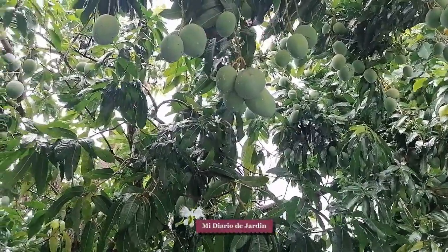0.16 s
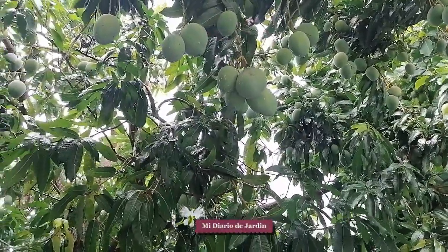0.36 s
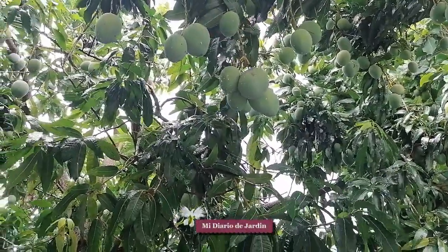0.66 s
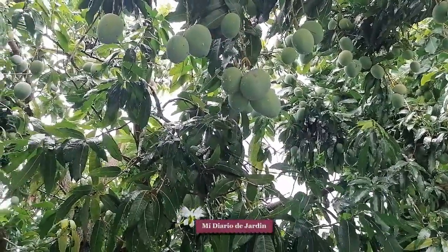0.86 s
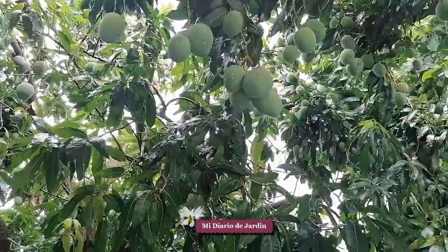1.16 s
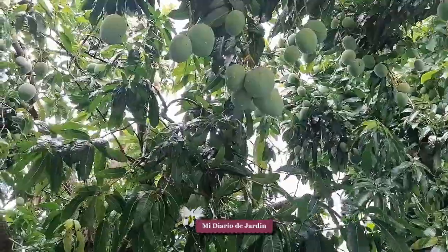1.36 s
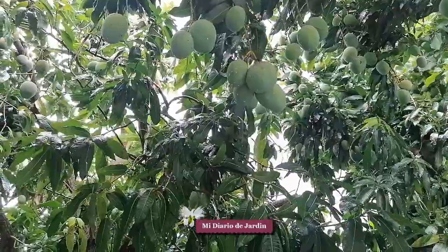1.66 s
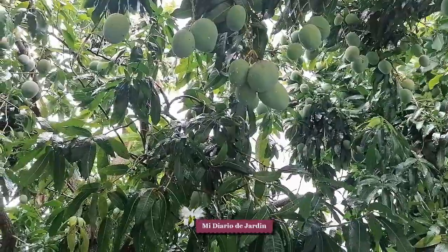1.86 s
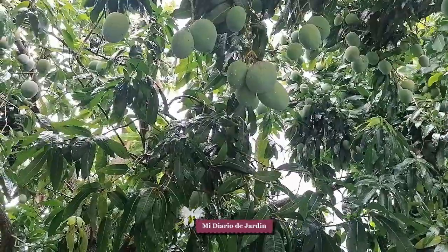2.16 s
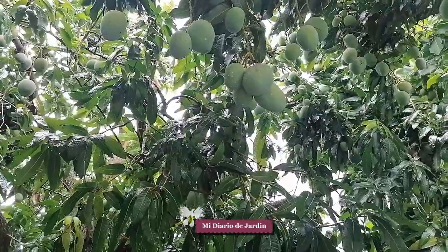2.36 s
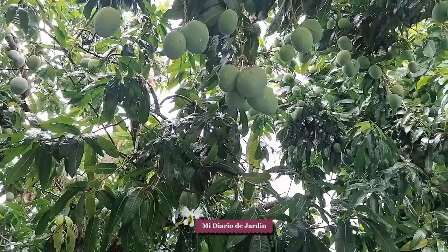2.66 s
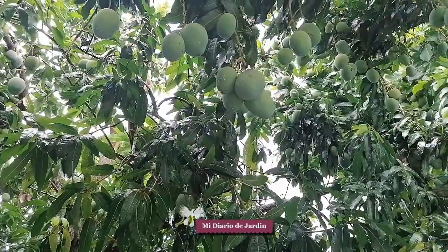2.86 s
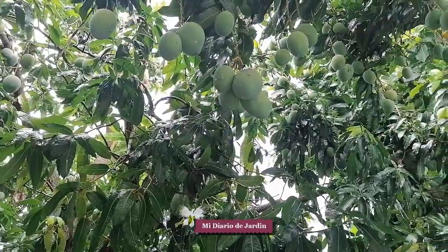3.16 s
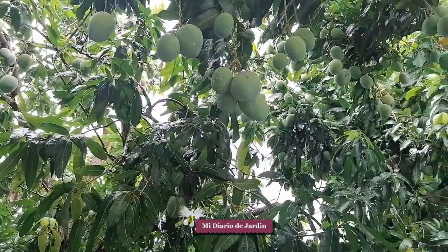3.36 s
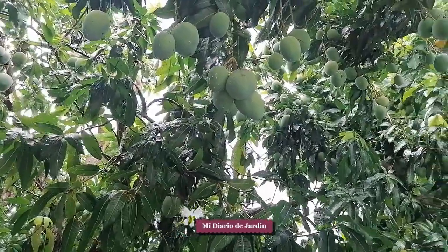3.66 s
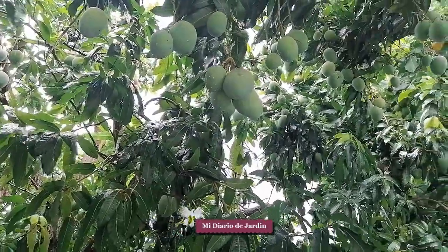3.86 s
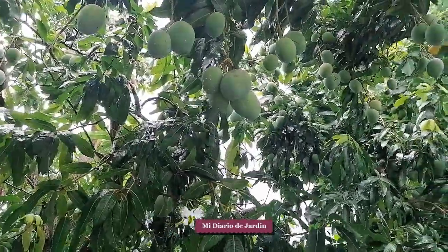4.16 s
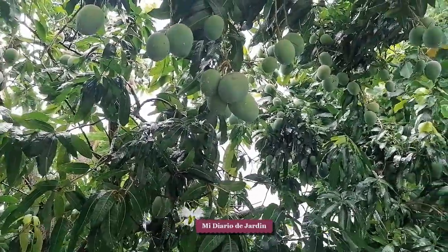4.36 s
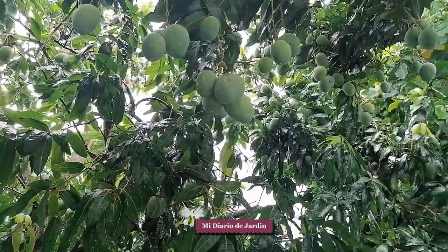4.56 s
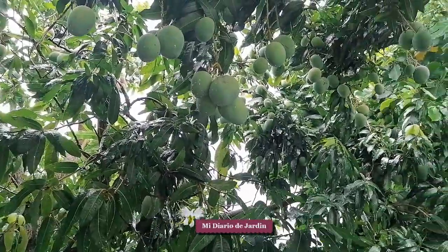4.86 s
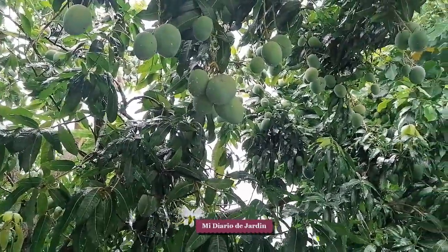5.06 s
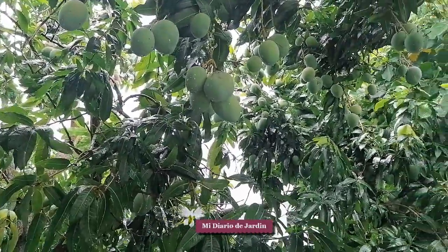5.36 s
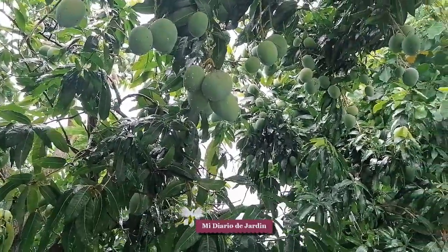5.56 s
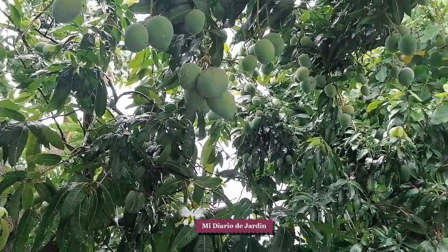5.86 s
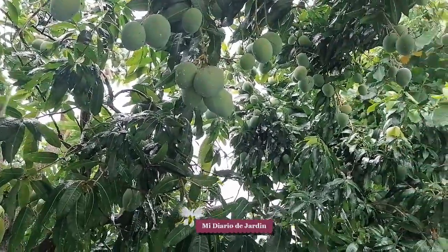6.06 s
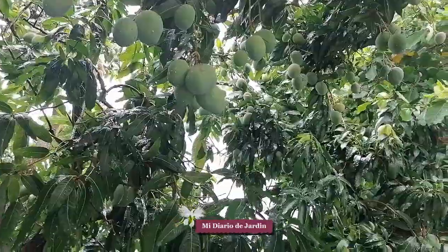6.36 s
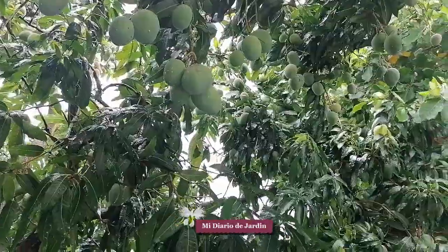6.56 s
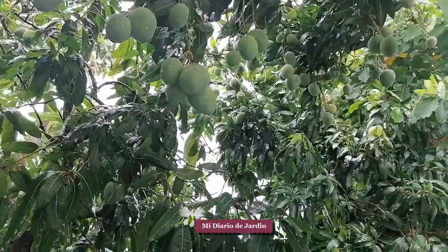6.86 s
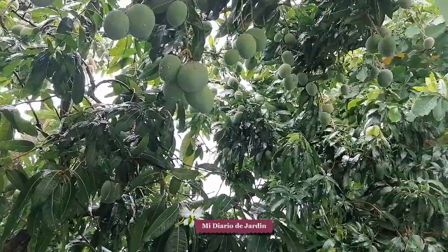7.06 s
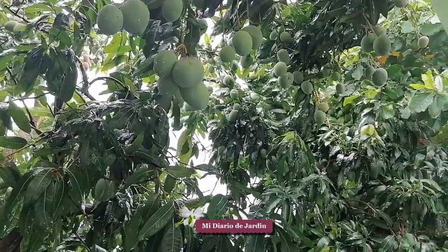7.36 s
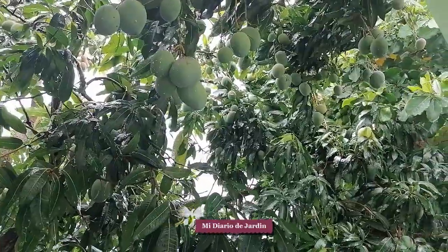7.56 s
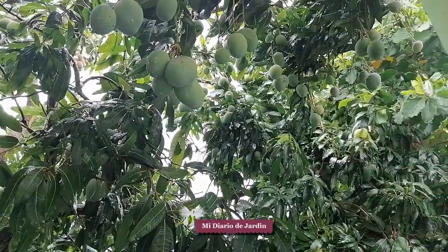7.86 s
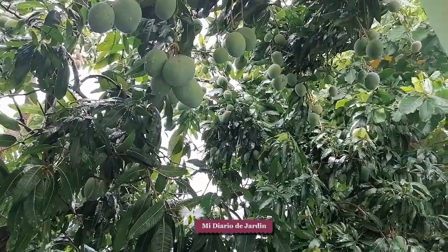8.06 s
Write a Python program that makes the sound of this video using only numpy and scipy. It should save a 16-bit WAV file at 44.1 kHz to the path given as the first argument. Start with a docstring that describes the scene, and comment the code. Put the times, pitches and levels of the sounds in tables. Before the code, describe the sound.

Steady rain patters densely on mango tree leaves, big drops smacking nearby foliage, with faint low rumbles and one brief cut to silence.

```python
"""Big drops of steady rain smack the nearest leaves of a fruit tree, heard from close below, in mono.
Each is a coloured noise burst, a weaker rebound and a decaying spray. Behind them come a patter of
random leaf taps, narrow-band ticks, faintly pitched plips, dull plops on soil and a wash of shaped noise.
A low resonant rumble swells now and then in the distance; all sound cuts out once for a moment."""
import sys
import numpy as np
from scipy import signal
from scipy.fft import rfft, irfft
from scipy.io import wavfile
from scipy.ndimage import uniform_filter1d

SR = 44100
rng = np.random.default_rng(int(sys.argv[2]) if len(sys.argv) > 2 else 0)


def materialize(psi):
    """Save the field psi as 16-bit PCM at rate SR to the path in sys.argv[1].

    A 1-D psi becomes a single channel; in a 2-D psi each row is a channel.
    """
    bounded = np.clip(np.atleast_2d(psi).T, -1, 1)
    quanta = np.round(bounded * 32767).astype(np.int16)
    wavfile.write(sys.argv[1], SR, quanta)


N = 361619
TIME = np.arange(N) / SR


def gain_of(db):
    """Decibels to amplitude."""
    return 10 ** (np.asarray(db) / 20)


def evened(x):
    """Scales to rms 1."""
    return x / np.sqrt(np.mean(x ** 2) + 1e-20)


def read(points, hz):
    """Reads a (Hz, dB) curve on a log-frequency axis."""
    f, value = np.transpose(points)
    return np.interp(np.log(hz + 1), np.log(f + 1), value)


def follow(curve):
    """Reads a (seconds, value) curve at every sample."""
    return np.interp(TIME, *np.transpose(curve))


def add(mix, start_s, sound):
    """Mixes a sound in at start_s."""
    part = mix[max(round(start_s * SR), 0):][:len(sound)]
    part += sound[:len(part)]


def tint(x, db):
    """Filters x by one dB value per frequency bin."""
    return irfft(rfft(x) * gain_of(db), len(x))


def band_db(hz, centre_hz, width_hz):
    """Response of one narrow resonance, 0 dB at its centre."""
    return -20 * np.log10(1 + ((hz - centre_hz) / width_hz) ** 2)


# Far-rain spectrum. Each row: frequency in Hz, relative level in dB.
WASH_SPECTRUM = [(15, -0.5), (35, 5), (90, -0.5), (170, -16), (300, -13.5), (700, 3.5), (1300, -3),
                 (2050, 4.5), (2900, 1), (4700, 1.5), (6300, 4.5), (8000, 1), (9500, -5)]


def wash(patchy_db=0.4):
    """Far rain: drops too many to tell apart, as shaped noise with faint patches in time and pitch."""
    frames, hz = N // 256 + 5, np.fft.rfftfreq(1024, 1 / SR)
    real, imag, patches = rng.standard_normal((3, frames, len(hz)))
    patches = uniform_filter1d(patches, size=8, axis=0)
    patches = evened(uniform_filter1d(patches, size=14, axis=1))
    z = (real + 1j * imag) * gain_of(read(WASH_SPECTRUM, hz) + patchy_db * patches)
    return evened(signal.istft(z.T, nperseg=1024, noverlap=768)[1][:N])


def swell(start_s, hold_s, db, attack_s=0.017, release_db_per_s=78):
    """A swell rises quickly, holds and dies away."""
    attack = np.clip((TIME - start_s) / attack_s + .5, 0, 1)
    return attack * gain_of(db - release_db_per_s * np.maximum(TIME - start_s - hold_s, 0))


# Rumble swells. Each row: start in seconds, hold in seconds, level in dB before the rumble's trim,
# deep bass in dB relative to that level.
RUMBLE_SWELLS = [(0, .15, -42, -22), (0.317, 0.12, -35, -22), (0.513, 0.21, -37, -12),
                 (0.829, .1, -38, -16), (1.44, 0.23, -47, -14), (1.81, 0.13, -42.5, -15),
                 (4.9, 0.12, -42.5, -3.5), (5.54, 0.082, -48, -25), (6.533, 0.072, -45, -12),
                 (6.728, 0.07, -41, -18), (7.718, 0.068, -44, -14)]


def swells(bed_db=-46):
    """Amplitude of the rumble, swells added in power to a steady bed, and of its deep bass."""
    power, bass_power = gain_of(bed_db) ** 2, 0
    for start_s, hold_s, db, bass_db in RUMBLE_SWELLS:
        swell_power = swell(start_s, hold_s, db) ** 2
        power = power + swell_power
        bass_power = bass_power + swell_power * gain_of(bass_db) ** 2
    return np.sqrt(power), np.sqrt(bass_power)


# Hollow resonances of the rumble. Each row: centre in Hz, width in Hz, relative level in dB.
HOLLOW_RESONANCES = [(136, 30, -7), (179, 50, -3), (267, 44, -2), (308.7, 25, 1), (402, 62, -7.5),
                     (465, 58, -5.5), (530, 200, -10.5), (700, 180, -14.5), (896, 50, -15.5)]
# Single-pitch booms. Each row: start in seconds, length in seconds, pitch in Hz, peak level in dB.
PITCHED_BOOMS = [(0.408, 0.083, 309, -49), (0.478, 0.093, 250.4, -33.5), (.522, 0.038, 167, -31.5),
                 (.57, 0.11, 311, -33.5), (0.664, 0.063, 310, -34), (0.838, 0.13, 312, -36)]
# Deep-bass band: lower edge in Hz, upper edge in Hz.
BASS_BAND_HZ = (68.2, 190)


def rumble(trim_db=-1, low_hz=100):
    """Distant noise in hollow resonances, deep bass under its swells, and brief single-pitch booms."""
    hz = np.fft.rfftfreq(N, 1 / SR)
    power = sum(gain_of(db) ** 2 / (1 + (2 * (hz - f) / width) ** 2) for f, width, db in HOLLOW_RESONANCES)
    power *= 1 - np.exp(-(hz / low_hz) ** 6)
    noise = tint(rng.standard_normal(N), 10 * np.log10(power + 1e-12))
    noise /= np.sqrt(uniform_filter1d(noise ** 2, size=3000))  # rolls on evenly within each swell
    level, bass_level = swells()
    bass_filter = signal.butter(2, BASS_BAND_HZ, "bandpass", fs=SR, output="sos")
    bass = evened(signal.sosfilt(bass_filter, rng.standard_normal(N)))
    out = (noise * level + bass * bass_level) * gain_of(trim_db)
    for start_s, length_s, pitch_hz, db in PITCHED_BOOMS:
        t = np.arange(round(length_s * SR)) / SR
        tone = np.sin(2 * np.pi * (pitch_hz * t + rng.random()))
        add(out, start_s, gain_of(db) * signal.windows.tukey(len(t), .6) * tone)
    return out


def plops(per_s=70, low_hz=850, high_hz=2800, cycles=1.9, count=16):
    """Drips from the tree land on the soil: short, dull pats of a few sine cycles."""
    out, t = np.zeros(N), np.arange(2 ** 11) / SR
    for hz in np.geomspace(low_hz, high_hz, count):
        u = 2 * t * hz / cycles
        pat = evened(u * np.exp(-u) * np.sin(2 * np.pi * hz * t))
        sizes = gain_of(2 * np.minimum(rng.exponential(1, N), 3))
        landings = rng.random(N) < per_s / count / SR
        out += signal.oaconvolve(sizes * landings, pat)[:N]
    return evened(out)


def leaf_colour(points, hz, slap_db, slap_hz, ripple_db, slap_width_hz, count=70):
    """Each leaf has its own random resonances, and more or less of a hollow slap."""
    knots = np.linspace(0, SR / 2, num=count)
    ripple = np.interp(hz, knots, rng.standard_normal(len(knots)))
    slap = np.exp(-((hz - slap_hz) / slap_width_hz) ** 2)
    return read(points, hz) + slap_db * slap + ripple_db * ripple


def smack(t, length_s):
    """A drop flattening on a leaf: a very short burst of noise."""
    u = t / length_s
    return u * np.exp(-u) * rng.choice([-1., 1.], len(t))


def spray(t, t60_s, grain_db, rise_s=0.00088):
    """Droplets and echoes scattering through the foliage: grainy, decaying noise."""
    wander = evened(uniform_filter1d(rng.standard_normal(len(t)), size=40))
    grainy = evened(gain_of(grain_db * wander) * rng.standard_normal(len(t)))
    return grainy * (1 - np.exp(-t / rise_s)) * gain_of(-60 * t / t60_s)


# Patter spectrum. Each row: frequency in Hz, relative level in dB.
PATTER_SPECTRUM = [(100, -27), (350, -8), (1100, -9), (2000, -3.5), (2900, -6.5), (4000, -5.5),
                   (4900, -2.5), (6300, -8), (7700, 2.5), (9500, -0.5)]


def patter(per_s=240, spread_db=2.5, wet_db=2, t60_s=0.29, length_s=0.00048, count=56):
    """Many leaves deeper in the tree, each with its own colour, struck at random by drops of all sizes."""
    out, t = np.zeros(N), np.arange(2 ** 13) / SR
    hz = np.fft.rfftfreq(len(t), 1 / SR)
    taps = []
    for _ in range(count):
        tap = evened(smack(t, length_s * rng.uniform(0.18, 1.95)))
        tap += gain_of(wet_db) * evened(spray(t, t60_s, grain_db=1.0))
        slap_db, slap_hz = 4.5 * rng.standard_normal() - 2, rng.uniform(3500, 5800)
        colour = leaf_colour(PATTER_SPECTRUM, hz, slap_db, slap_hz, ripple_db=3.5, slap_width_hz=800)
        taps.append(evened(tint(tap, colour)))
    for when, leaf, size in rng.random((2 ** 13, 3))[:round(per_s * N / SR)]:
        size_db = spread_db * min(-np.log(1 - size), 3)  # most drops are small
        add(out, when * N / SR, gain_of(size_db) * taps[int(leaf * count)])
    return evened(out)


def flicker(x):
    """The treble, most of all 4 to 7 kHz, flickers in patches a few hundred Hz wide, some 30 ms long."""
    hz, _, z = signal.stft(x, SR, nperseg=512, noverlap=384)
    patches = rng.standard_normal(z.shape)
    for _ in range(2):
        patches = uniform_filter1d(patches, size=2, axis=0)
        patches = uniform_filter1d(patches, size=9, axis=1)
    depth_points = [(1000, .3), (2500, 1.2), (4200, 3), (6500, 3.2), (8000, 1.6), (14000, 1.6)]  # Hz, dB
    gains = gain_of(read(depth_points, hz)[:, None] * np.minimum(evened(patches), 1.5))
    gains /= np.sqrt(np.mean(gains ** 2, axis=1, keepdims=True))
    return signal.istft(z * gains, nperseg=512, noverlap=384)[1][:N]


def leaf_ticks(per_s=75, low_hz=3200, high_hz=6800, width_hz=330, t60_s=0.16):
    """Small drops on stiff blades: each rings for a moment in one narrow band."""
    out, t = np.zeros(N), np.arange(2 ** 11) / SR
    hz = np.fft.rfftfreq(len(t), 1 / SR)
    bursts = rng.standard_normal((2 ** 7, len(t))) * gain_of(-60 * t / t60_s)
    for k, (when, a, b, size) in enumerate(rng.random((2 ** 11, 4))[:round(per_s * N / SR)]):
        pitch_hz = low_hz * (high_hz / low_hz) ** ((a + b) / 2)  # middling blades are the commonest
        tick = tint(bursts[k % len(bursts)], band_db(hz, pitch_hz, width_hz))
        add(out, when * N / SR, gain_of(13.0 * size) * evened(tick))
    return evened(out)


# Faintly pitched drips. Each row: start in seconds, pitch in Hz, nominal peak level in dB.
PITCHED_DRIPS = [(.561, 3040, -34), (1.266, 1435, -38), (1.409, 1950, -37), (1.722, 1435, -38),
                 (1.887, 2810, -37), (2.323, 3390, -33), (3.054, 1550, -34), (4.317, 1660, -38),
                 (4.514, 918, -36), (5.219, 1605, -36), (7.164, 1035, -38), (7.279, 3390, -27),
                 (7.399, 2870, -37)]


def plips(t60_s=0.17, rise_s=0.0005, width_hz=130):
    """Single drips ring briefly around one pitch, blurred by the foliage into narrow-band noise."""
    out, t = np.zeros(N), np.arange(2 ** 12) / SR
    bins_hz = np.fft.rfftfreq(len(t), 1 / SR)
    for start_s, pitch_hz, db in PITCHED_DRIPS:
        ring = evened(tint(rng.standard_normal(len(t)), band_db(bins_hz, pitch_hz, width_hz)))
        envelope = gain_of(db - 60 * t / t60_s) * (1 - np.exp(-t / rise_s))
        add(out, start_s, envelope * ring / np.sqrt(2))
    return out


def lesser_drops(per_s=2.3, hit_db=-22, tail_db=-35, slap_max_db=8, low_hz=3500, high_hz=6000):
    """Lighter drops reach the near leaves at random; rows like those of the big ones."""
    draws = rng.random((2 ** 8, 3))[:round(per_s * N / SR)]
    return [(when * N / SR, hit_db, tail_db, slap_max_db * hollow, low_hz + (high_hz - low_hz) * leaf)
            for when, hollow, leaf in draws]


# Big drops on the nearest leaves. Each row: start in seconds, smack level in dB, spray level in dB,
# extra weight of the leaf's slap in dB, slap frequency in Hz.
BIG_DROPS = [(0.0585, -17.5, -31, 9, 4320), (0.0787, -19, -30.5, 16, 4760), (0.392, -15, -28, 6, 4750),
             (0.59, -19.5, -29, 5, 3600), (0.9491, -16, -19.5, 4.5, 5260), (1.0471, -28, -24.5, 3, 5600),
             (1.2634, -21, -26.5, 11.5, 3560), (1.276, -14.5, -38, -6, 3720), (1.3588, -16, -27, 13, 3300),
             (1.492, -9.5, -21.5, 2.5, 4330), (1.5905, -20, -31, 10, 4080), (1.776, -15.5, -29, 11, 5330),
             (1.818, -15.5, -28, -3, 5900), (1.885, -16, -32, -5, 4200), (1.891, -21, -22, 5, 2900),
             (1.9633, -15.5, -25, -1, 4900), (2.1577, -17, -23, 8, 4000), (2.172, -17, -21, 3, 4600),
             (2.2807, -17, -26, -1, 4500), (2.311, -12, -22, 9.5, 3770), (2.495, -17, -24, -8, 3100),
             (2.603, -15.5, -27, 8, 5030), (3.033, -23, -24.5, 10, 3700), (3.058, -11.5, -21, 4, 3550),
             (3.1362, -14, -27, 11, 4030), (3.259, -13.5, -19, 0, 5780), (3.8792, -13, -26, 0, 3100),
             (4.2994, -30, -25, 3, 3600), (4.3365, -17, -24, 0, 3400), (4.4898, -19, -26, -11, 5900),
             (4.6214, -17, -30, 6.5, 4560), (4.843, -18.5, -29, 8, 4100), (4.8866, -15.5, -25.5, 4, 5150),
             (5.0069, -15.5, -26, -2, 6100), (5.2479, -14.5, -26, 7, 5100), (5.3284, -7, -20.5, 10.5, 4700),
             (5.4108, -20.5, -26, 6.5, 5100), (5.779, -20, -32, -1, 4700), (5.9146, -31, -24.5, 11, 4900),
             (5.965, -15.5, -30, 5, 5150), (6.1801, -17, -29, 0, 5000), (6.2656, -9, -25.5, 8.5, 4930),
             (6.287, -17, -22, 6, 5300), (6.5085, -18, -18.5, 3, 5800), (6.8324, -22.5, -35, 6, 6100),
             (7.1414, -14, -21.5, 1, 5600), (7.238, -16.5, -35, 4, 4800), (7.2842, -14.5, -20.5, 11, 3600),
             (7.3159, -9.5, -18.5, 5, 5700), (7.3287, -11.5, -24, 4, 5500), (7.7713, -9, -24.5, 9, 4760),
             (8.0393, -17.5, -23.5, 10, 4540)]
# Spectrum of a drop on a wet leaf. Each row: frequency in Hz, relative level in dB.
LEAF_SPECTRUM = [(100, -21), (350, -12), (1000, -14), (1800, -12), (2800, -13.5), (4300, -5), (6200, -6.5),
                 (7600, 1), (9500, -.3)]
REBOUND_S, REBOUND_DB = .0032, -4  # the splash lands again just after the smack
REBOUND_LOSS_PER_DB = 1.2  # leaves that give and slap swallow the rebound
SOFTNESS_PER_DB = .035  # the more a leaf slaps, the longer the smack; stiff leaves tick
# A drop shoves the whole leaf: low body, more the harder it lands.
PUSH_DB, PUSH_HZ, PUSH_PER_DB, TYPICAL_SMACK_DB = 2.5, 2017, 0.42, -15


def near_drops(length_s=0.00066, t60_s=0.26):
    """Drops on the nearest leaves: a sharp smack, a softer rebound, then spray."""
    out, t = np.zeros(N), np.arange(2 ** 13) / SR
    hz = np.fft.rfftfreq(len(t), 1 / SR)
    smack_samples = 66  # smack levels are rms over this span
    for start_s, hit_db, tail_db, slap_db, slap_hz in BIG_DROPS + lesser_drops():
        colour = leaf_colour(LEAF_SPECTRUM, hz, slap_db, slap_hz, ripple_db=1.54, slap_width_hz=1650)
        colour -= 10 * np.log10(np.mean(gain_of(colour) ** 2))
        push = (PUSH_DB + PUSH_PER_DB * (hit_db - TYPICAL_SMACK_DB)) / (1 + (hz / PUSH_HZ) ** 4)
        hit_length_s = length_s * np.exp(SOFTNESS_PER_DB * slap_db)
        rebound_db = hit_db + REBOUND_DB - REBOUND_LOSS_PER_DB * max(slap_db, 0)
        for delay_s, db in (0, hit_db), (REBOUND_S, rebound_db):
            hit = tint(smack(t, hit_length_s), colour + push)
            hit *= np.sqrt(smack_samples) / np.linalg.norm(hit)
            add(out, start_s + delay_s, gain_of(db) * hit)
        add(out, start_s, gain_of(tail_db) * tint(spray(t, t60_s, grain_db=-1.0), colour))
    return out


def flurries(low_hz=3, high_hz=9, count=24):
    """The drops come in small flurries: a random wander of rms 1 from summed sines."""
    rates_hz = np.geomspace(low_hz, high_hz, count)
    t = np.arange(0, N / SR + .01, .01)
    wander = np.sin(2 * np.pi * (rates_hz * t[:, None] + rng.random(count))) @ rates_hz ** -.5
    return evened(np.interp(TIME, t, wander))


# How hard the shower falls. Each row: time in seconds, level in dB before each layer's trim.
SHOWER_LEVEL = [(0, -32), (.5, -34.5), (1.2, -32), (1.75, -34), (2.2, -32), (2.85, -33), (3.05, -29.5),
                (3.3, -35), (3.68, -35), (4.15, -32), (4.5, -33.5), (5.15, -34), (5.42, -33), (6.05, -32.5),
                (6.55, -32), (7.42, -31.5), (7.6, -34), (8.2, -33)]


def scene(patter_db=3.0, ticks_db=-11.5, wash_db=-39, wash_share=0.19, plops_db=-53, flurry_db=0.34):
    """The shower drives the patter and the ticks fully, and the far wash a little."""
    shower_db = follow(SHOWER_LEVEL) + flurry_db * flurries()
    rain = patter() * gain_of(shower_db + patter_db)
    ticks = leaf_ticks() * gain_of(shower_db + ticks_db)
    far = wash() * gain_of(wash_db + wash_share * (shower_db - shower_db.mean()))
    soil = gain_of(plops_db) * plops()
    mono = near_drops() + flicker(rain + far) + ticks + soil + plips() + rumble()
    return np.array([mono, mono])


# Cut-out: start in seconds, end in seconds.
SILENT_SPAN_S = (3.3085, 3.648)
# Notched treble band: lower edge in Hz, upper edge in Hz.
NOTCH_BAND_HZ = (10020, 12010)
# Microphone roll-off at the very top. Each row: frequency in Hz, gain in dB.
MICROPHONE_ROLLOFF = [(9500, 0), (12300, -2), (14400, -2.3), (15000, -4.5), (15700, -9)]


def record(dry, notch_db=-33, edge_hz=15750):
    """Microphone roll-off, one moment of silence, a notch in one treble band, then the band limit."""
    live = (TIME < SILENT_SPAN_S[0]) | (TIME > SILENT_SPAN_S[1])
    notch = signal.firwin(801, NOTCH_BAND_HZ, window=("kaiser", 6), fs=SR)
    limit = signal.firwin(511, edge_hz, window=("kaiser", 9), fs=SR)
    cut = tint(dry[0], read(MICROPHONE_ROLLOFF, np.fft.rfftfreq(N, 1 / SR))) * live
    notched = signal.oaconvolve(cut, notch, "same") + gain_of(notch_db) * cut  # the notch keeps a floor
    return np.tile(signal.oaconvolve(notched, limit, "same"), (2, 1))


dry = scene()
out = record(dry)
materialize(out)
```